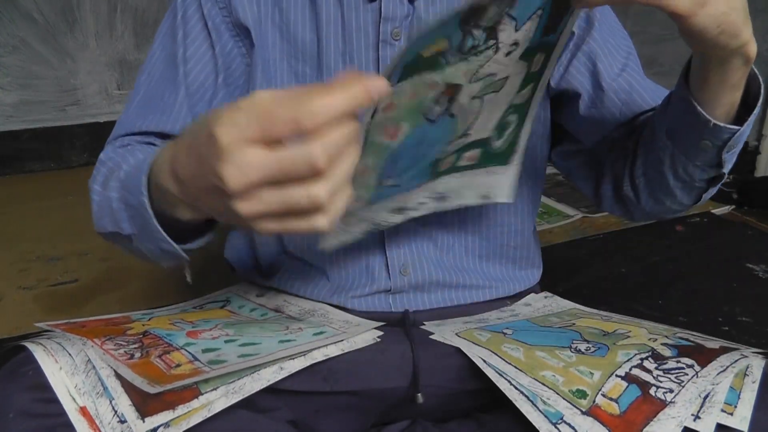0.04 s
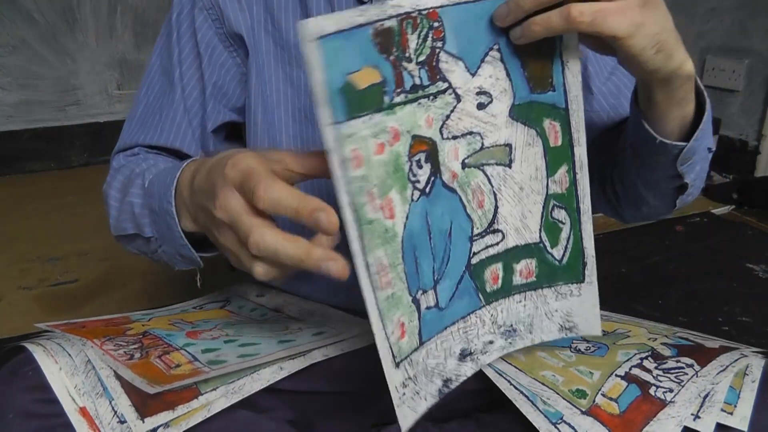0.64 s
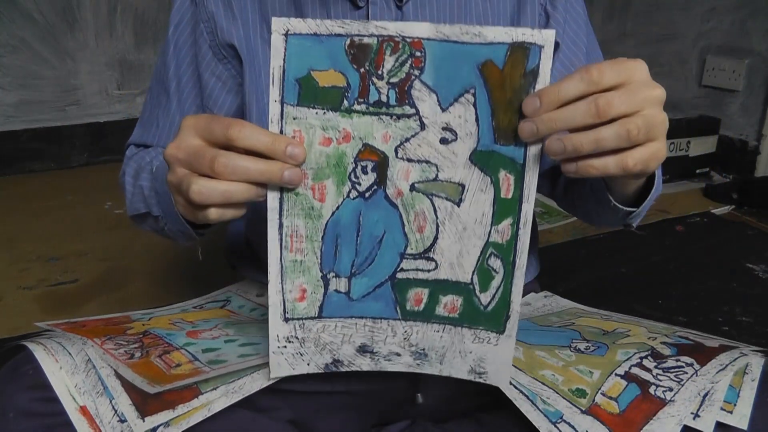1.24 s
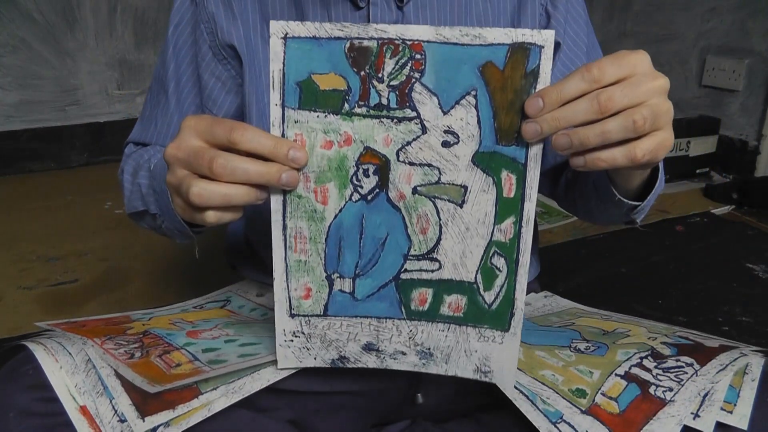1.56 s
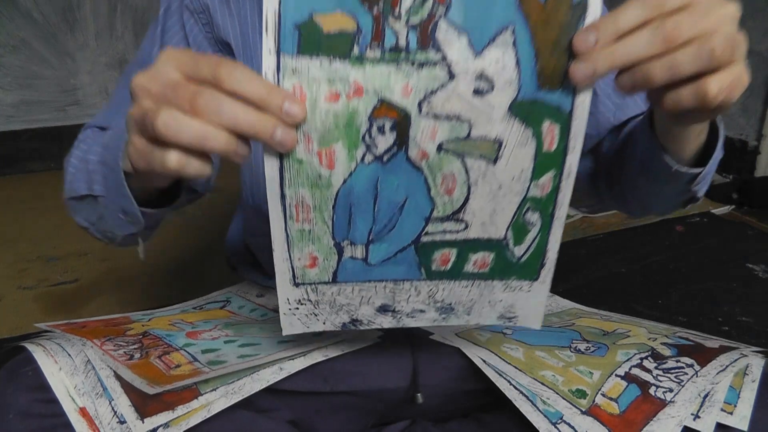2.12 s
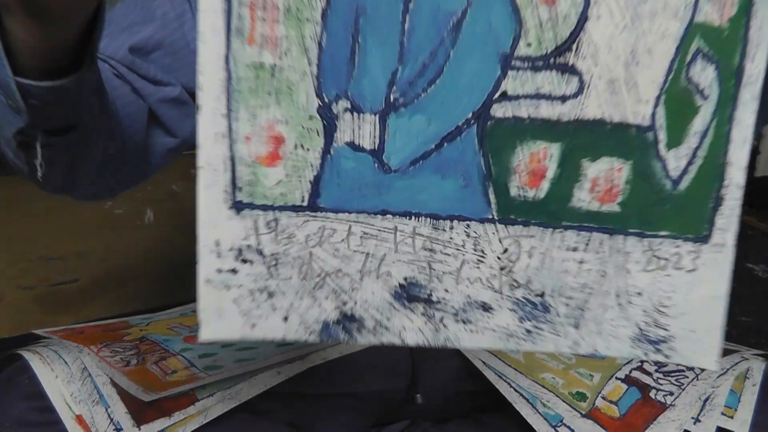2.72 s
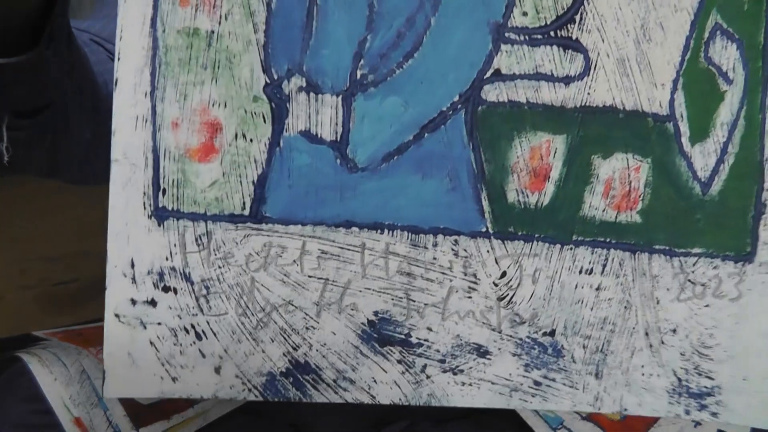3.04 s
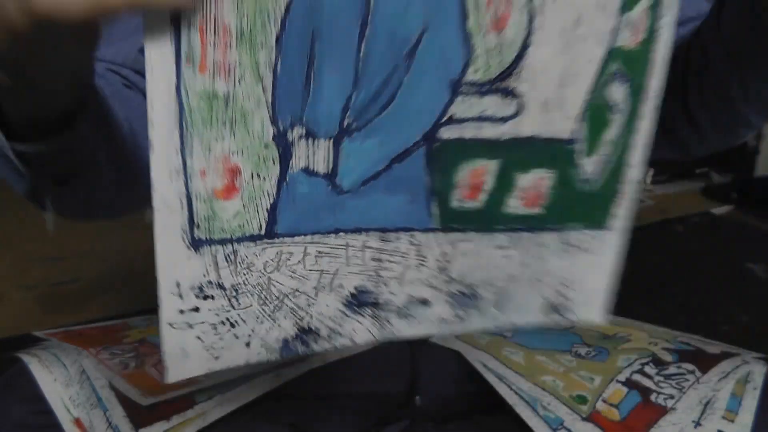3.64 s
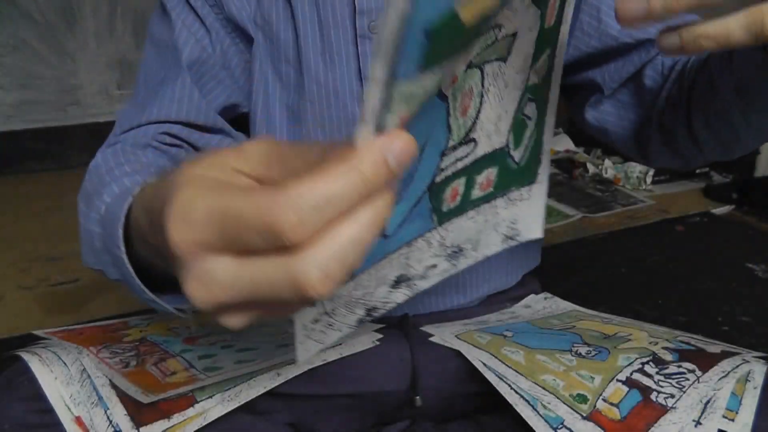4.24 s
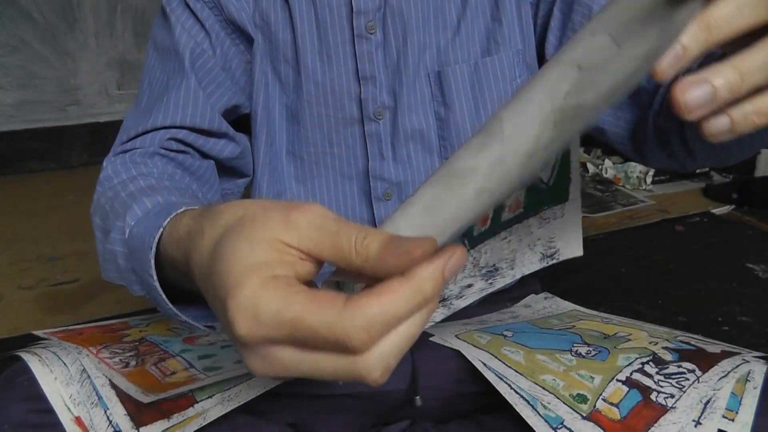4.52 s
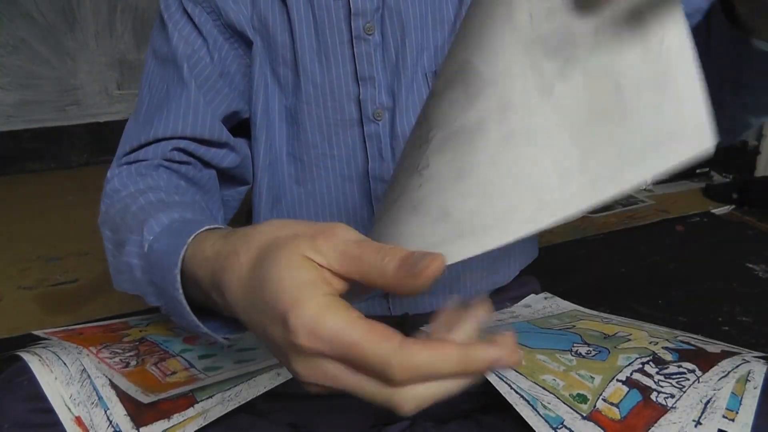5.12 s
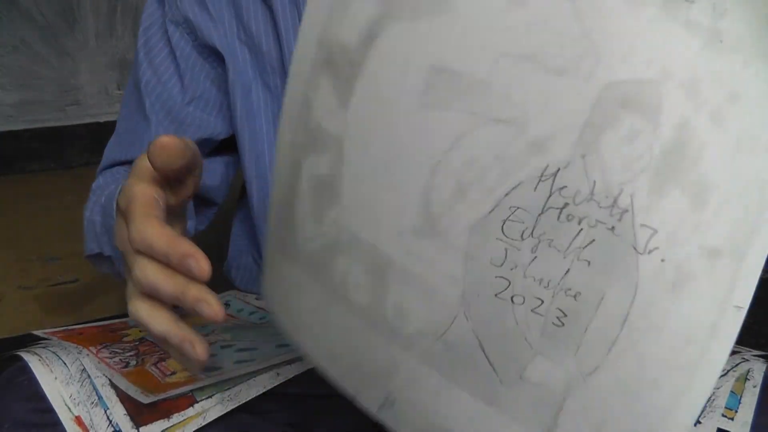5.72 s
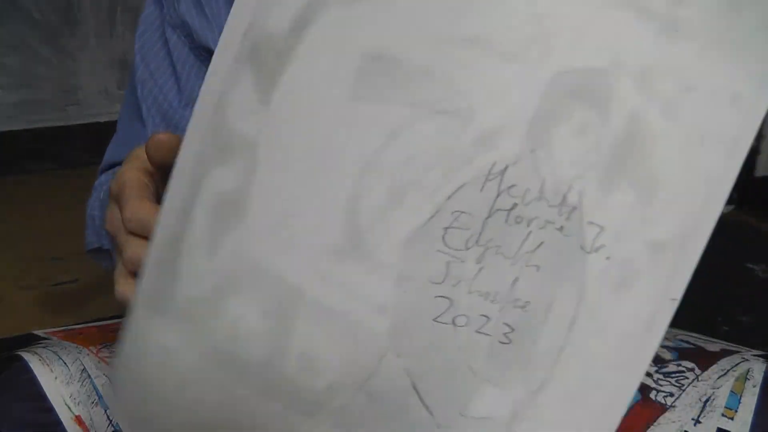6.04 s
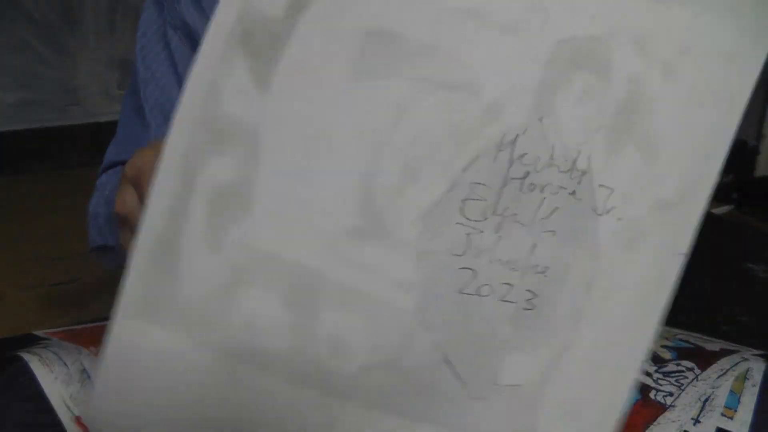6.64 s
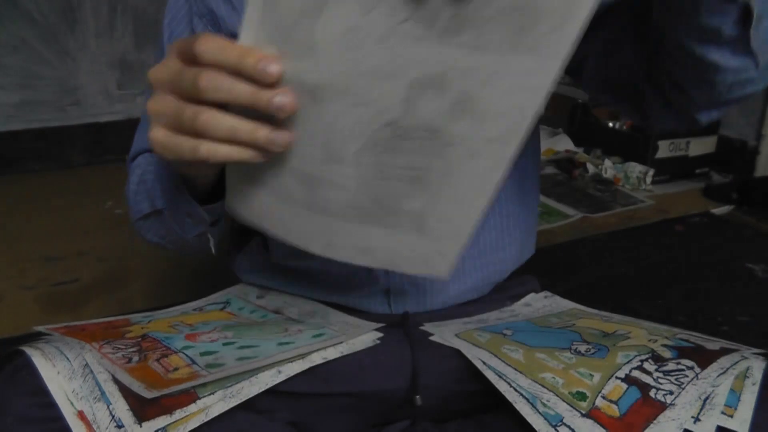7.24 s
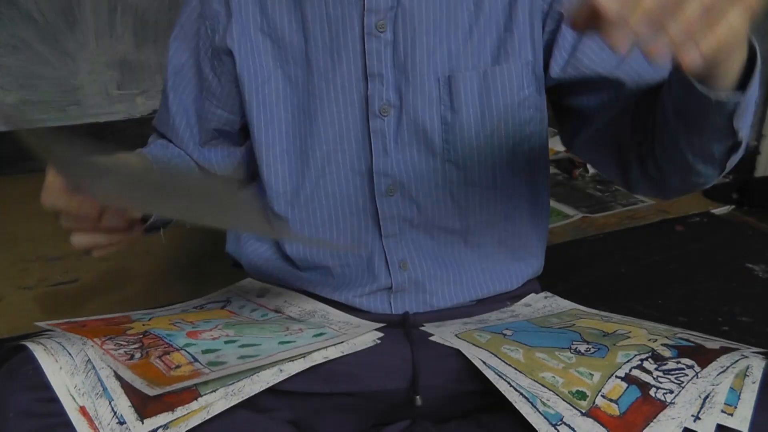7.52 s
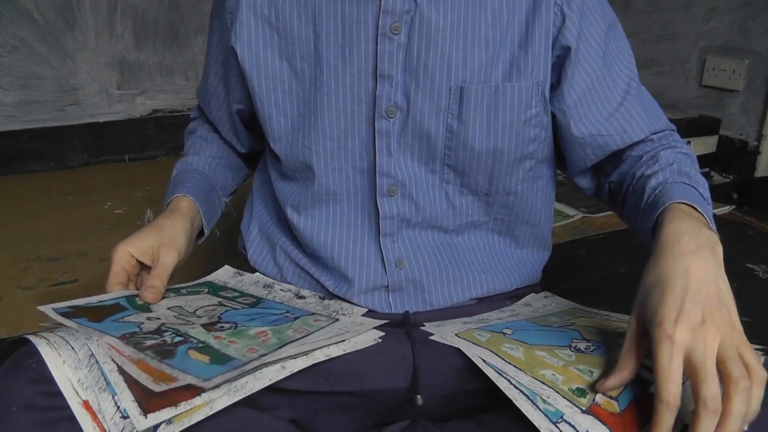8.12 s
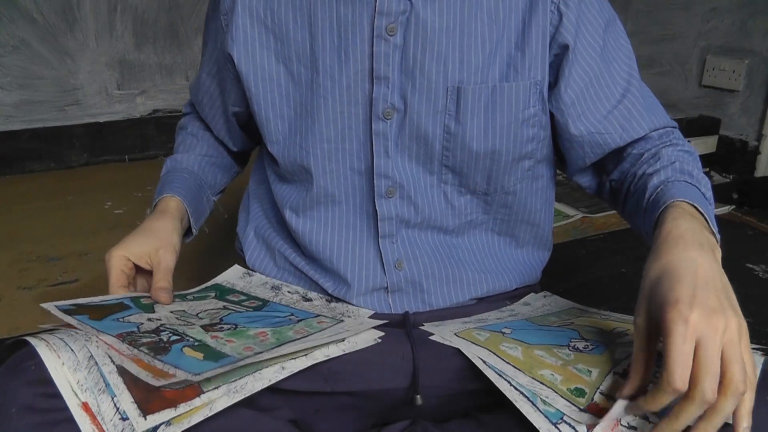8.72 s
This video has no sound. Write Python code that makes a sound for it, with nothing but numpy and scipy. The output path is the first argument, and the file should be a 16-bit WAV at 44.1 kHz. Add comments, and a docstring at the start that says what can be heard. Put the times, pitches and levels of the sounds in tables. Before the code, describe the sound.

Over the faint, steady hum of a small fan, someone handles a stiff paper print, heard close up in stereo in a small, muted room. Dry finger rubs, sharp edge ticks and hollow flexing pops come in two busy spells with a quieter stretch between them. The sheet then flaps, pushing a little air at the microphones, and finally glides paper on paper onto a stack.

```python
"""A small dull room, a stereo pair close to someone on a chair; a small fan hums throughout.
They hold up a stiff paper print: fingers slide over it, its edge snaps free with crisp ticks, and it
buckles with hollow pops and flaps. Softer rubs follow at 2 s, then the handling is busy again from
3.5 to 5.6 s as the sheet is turned about. Near 7.2 s it flaps and wafts air at the microphones;
from 7.8 s it slides onto a pile, paper on paper, smoother and brighter than under the fingers."""
import sys
import numpy as np
from scipy import signal
from scipy.fft import rfft, irfft, next_fast_len
from scipy.io import wavfile

SR = 44100
rng = np.random.default_rng(int(sys.argv[2]) if len(sys.argv) > 2 else 0)


def dump(signal):
    """Clip the signal to [-1, 1] and save it as 16-bit WAV at the path in sys.argv[1]."""
    limited = np.clip(np.atleast_2d(signal).T, -1, 1)
    pcm = np.round(limited * 32767).astype(np.int16)
    wavfile.write(sys.argv[1], SR, pcm)


N = 395577
TIME = np.arange(N) / SR
# a flat spectrum: (frequency [Hz], level [dB])
WHITE = [(100, 0), (10000, 0)]


def from_db(db):
    """Decibels to gain."""
    return 10 ** (np.asarray(db) / 20)


def rms_one(x):
    """Scale to unit power."""
    return x / np.sqrt(np.mean(x ** 2) + 1e-20)


def at_hz(points, hz):
    """Read a spectrum on a log-frequency axis."""
    f, value = np.transpose(points)
    return np.interp(np.log(hz), np.log(f), value)


def colour(x, gain_at):
    """Filter by a gain that is a function of frequency."""
    size = next_fast_len(x.shape[-1] + 2048)
    hz = np.maximum(np.arange(size // 2 + 1) * SR / size, 1)
    return irfft(rfft(x, size) * gain_at(hz), size)[..., :x.shape[-1]]


def butter(x, hz, kind, order):
    """Causal Butterworth filter."""
    return signal.sosfilt(signal.butter(order, np.clip(hz, 10, .45 * SR), kind, fs=SR, output="sos"), x)


def drift(rate_hz, step=40):
    """Slow random wander with a spread of one."""
    pole = np.exp(-2 * np.pi * rate_hz * step / SR)
    noise = rng.standard_normal(N // step + 2002)
    slow = signal.lfilter([1], [1, -2 * pole, pole * pole], noise)[2000:]
    return np.interp(np.arange(N) / step, np.arange(len(slow)), rms_one(slow))


def stereo(pair, spectrum):
    """Two unrelated signals become one coloured sound, partly alike at the two microphones; rms 1."""
    # how alike the two microphones hear: (frequency [Hz], likeness [0-1])
    likeness = [(60, 0.1), (290, 0.35), (640, 0.25), (1400, 0.45), (2300, 0.85), (6000, 0.92), (8500, 0.25),
                (12000, 0.56)]

    def gain(hz, sign):
        return from_db(at_hz(spectrum, hz)) * np.sqrt(1 + sign * at_hz(likeness, hz))
    mid = colour(pair[0], lambda hz: gain(hz, 1))
    side = colour(pair[1], lambda hz: gain(hz, -1))
    return rms_one(np.array([mid + side, mid - side]))


def room_tone(level_db=-56):
    """The still air of the room: a steady, dark noise."""
    # spectrum of the air: (frequency [Hz], relative level [dB])
    air = [(25, -48), (45, -2.5), (70, -10), (110, 3.5), (160, -0.5), (260, 2), (480, -2), (800, -2),
           (1100, -8), (1600, -9), (2200, -12), (3500, -17.5), (5000, -21), (7000, -26), (15000, -24)]
    return from_db(level_db) * stereo(rng.standard_normal((2, N)), air)


def fan(rotor_hz=64.84, waver=0.001277, throb_db=0.78, whine_waver=0.0014):
    """Nine blades sing over weaker rotor orders, and the motor adds a thin whine."""
    # rotor tones: (order [multiple of the turning rate], level [dB])
    orders = [(6, -74.5), (7, -67.5), (9, -55.5), (10, -66.5), (12, -76.5), (14, -72.5)]
    # motor whine: (frequency [Hz], flutter rate [Hz], level [dB])
    whine = [(1342, 51, -71.5), (1369, 27, -69.5), (1378, 54, -74.5), (2040, 15, -79)]
    turn = 2 * np.pi * np.cumsum(rotor_hz * (1 + waver * drift(2.71))) / SR
    out = np.zeros(N)
    for order, db in orders:
        out += from_db(db + throb_db * drift(8.0)) * np.sin(order * turn + rng.uniform(0, 2 * np.pi))
    for hz, flutter_hz, db in whine:
        phase = 2 * np.pi * np.cumsum(hz * (1 + whine_waver * drift(flutter_hz))) / SR
        out += from_db(db + throb_db * drift(flutter_hz)) * np.sin(phase)
    return np.sqrt(2) * out


def room(x, wet_db, wall_hz, bass_db=-2, bass_hz=550, gap_s=0.0099, bass_t60_s=0.29, treble_t60_s=0.11):
    """Dense, dull reflections arrive after a short gap; bass and treble die away at their own rates."""
    t = TIME[:SR // 2]
    echoes = stereo(rng.standard_normal((2, len(t))), WHITE)
    bass = butter(echoes, bass_hz, "low", order=1)
    tail = bass * from_db(bass_db - 60 * t / bass_t60_s)
    tail += (echoes - bass) * from_db(-60 * t / treble_t60_s)
    tail = butter(rms_one(tail * (t > gap_s)) / np.sqrt(len(t)), wall_hz, "low", order=2)
    return x + from_db(wet_db) * signal.fftconvolve(np.atleast_2d(x), tail, axes=1)[:, :N]


def wafts(band_hz=(52, 200)):
    """The swinging sheet wafts air: soft swells of rumble, different at each microphone."""
    # swells of air: (time [s], level [dB], half length [s])
    swells = [(0.686, -54, 0.025), (3.693, -57.5, 0.29), (5.067, -58, 0.11), (5.5, -64, 0.47),
              (7.253, -48.5, 0.045)]
    swell = sum(from_db(db) * np.exp(-((TIME - s) / half) ** 2) for s, db, half in swells)
    return swell * rms_one(butter(rng.standard_normal((2, N)), band_hz, "band", order=4))


def friction(spectrum, per_s, spread_db):
    """Countless fibres catch and let go, each slip with a size of its own."""
    slips = rng.random(N) < per_s / SR
    sizes = from_db(spread_db * np.minimum(rng.exponential(1, N), 4))
    return stereo(slips * sizes * rng.standard_normal((2, N)), spectrum)


def sheet_ring(x, hz, width_hz, block=2048):
    """A resonance whose centre and width move with the grip; it keeps the power of white noise."""
    carrier = np.exp(2j * np.pi * np.cumsum(hz) / SR)
    slow, state = x * carrier.conj(), np.zeros((2, 2), complex)
    for at in range(0, N, block):
        b, a = signal.butter(2, width_hz[at] / 2, fs=SR)
        slow[:, at:at + block], state = signal.lfilter(b, a, slow[:, at:at + block], zi=state)
    return np.real(slow * carrier) * np.sqrt(2 * SR / width_hz)


def finger_rub(partner_wider=1.83):
    """Skin rubs the paper, and the sheet sings in two resonances that shift with the grip."""
    # spectrum of skin on paper: (frequency [Hz], relative level [dB])
    skin = [(150, -8), (450, 1.5), (950, 0), (1500, -0.5), (2200, -3), (2900, -0.5), (3500, -1.5),
            (4400, -5.5), (5100, -5), (7000, -35), (16000, -35)]
    # the resonance and its upper partner, levels against the plain rub:
    # (time [s], centre [Hz], width [Hz], level [dB], partner centre [Hz], partner level [dB])
    grip = [(.3, 3500, 1500, -6, 4960, -11), (.52, 2960, 1400, -14, 4460, -0.5),
            (.6, 2700, 650, 5, 4300, 0), (.66, 3580, 2200, -7, 5400, -17), (.94, 3960, 1100, -2, 4960, -18),
            (2.0, 3800, 500, -1.5, 4900, -12), (2.45, 3500, 1200, -4, 5800, -11),
            (2.66, 3670, 420, -6.5, 6000, -11), (3.5, 3600, 1200, 1, 7700, -6),
            (3.68, 3500, 1300, -4.5, 6900, -5), (3.88, 3400, 1200, -7, 6650, -9),
            (4.02, 3700, 1100, 0, 6800, -6.5), (4.47, 3220, 2000, -6, 5000, -15),
            (4.66, 3930, 1100, -4.5, 5060, -5), (4.94, 3850, 746, 3, 4800, -1.5),
            (5.04, 3950, 1100, -4, 4940, -7.5), (5.4, 3830, 1500, -12.5, 5100, -19),
            (6.96, 3550, 700, -1, 5000, -13), (7.24, 3380, 2000, -5, 5550, -4)]
    times, *columns = np.transpose(grip)
    hz, width_hz, ring_db, partner_hz, partner_db = [np.interp(TIME, times, c) for c in columns]
    ring, partner = from_db(ring_db), from_db(partner_db)
    slips = friction(WHITE, per_s=9000, spread_db=0.5)
    rub = friction(skin, per_s=9000, spread_db=0)
    rub += ring * sheet_ring(slips, hz, width_hz)
    rub += partner * sheet_ring(slips, partner_hz, partner_wider * width_hz)
    return rub / np.sqrt(1 + ring ** 2 + partner ** 2)


def strokes(shape=1.46, hold_rub_db=-96, hold_hiss_db=-77.5):
    """Gains of rub and hiss: both follow each stroke as it gathers speed and slows again."""
    # strokes of skin or paper along the sheet:
    # (fastest moment [s], relative rub level [dB], hiss level [dB], speeding up [s], slowing down [s])
    moves = [(0.04, -69, -65, 0.054, 0.073), (0.18, -56, -70, 0.27, 0.13), (0.32, -59.5, -71, 0.057, 0.06),
             (0.6, -53.5, -57.5, 0.13, 0.11), (0.675, -44, -61, 0.038, 0.026),
             (0.85, -50, -60, 0.032, 0.048), (0.95, -53.5, -62, 0.1, 0.063), (1.23, -60, -63, 0.076, 0.026),
             (1.32, -57.5, -63, 0.057, 0.063), (2.04, -62, -70, 0.16, 0.044), (2.3, -65, -72, 0.05, 0.084),
             (2.5, -61, -67.5, 0.1, 0.11), (2.66, -55.5, -61, 0.049, 0.063), (3.46, -62, -62, 0.032, .035),
             (3.57, -54.5, -63, 0.084, 0.14), (3.68, -54.5, -59, 0.073, 0.041),
             (3.86, -57.5, -66.5, 0.13, 0.091), (4.02, -58.5, -68, 0.076, 0.076),
             (4.48, -54.5, -61.5, 0.078, 0.045), (4.625, -54.5, -60, 0.023, 0.15),
             (4.96, -50.5, -59, 0.064, 0.067), (5.03, -45, -52.5, 0.057, 0.077),
             (5.17, -54.5, -59, 0.04, 0.045), (5.245, -48, -55.5, 0.025, 0.097),
             (5.36, -56.5, -68, 0.035, 0.11), (5.541, -54, -63.5, 0.068, 0.038),
             (6.96, -58.5, -67, 0.047, 0.042), (7.11, -61, -72, 0.048, 0.084),
             (7.235, -51, -55.5, 0.023, 0.041), (7.68, -61, -68, 0.3, 0.12), (7.9, -55.5, -74, 0.02, 0.078),
             (7.98, -58, -56.5, 0.094, 0.1), (8.12, -54.5, -59, 0.22, 0.16), (8.42, -62, -66, 0.032, 0.1),
             (8.58, -56.5, -61.5, 0.053, 0.11), (8.66, -55.5, -56, 0.093, 0.018),
             (8.77, -56, -60.5, 0.11, 0.037), (8.9, -65, -68.5, 0.15, 0.18)]
    t = TIME[::40]
    # fingers that only hold the sheet still creep a little
    rub_power, hiss_power = from_db(hold_rub_db) ** 2, from_db(hold_hiss_db) ** 2
    for s, rub_db, hiss_db, rise, fall in moves:
        # a shape of 2 is a bell; less gives a sharper top and longer skirts
        speed = np.exp(-(np.abs(t - s) / np.where(t < s, rise, fall)) ** shape)
        rub_power += (from_db(rub_db) * speed) ** 2
        hiss_power += (from_db(hiss_db) * speed) ** 2
    return np.interp(TIME, t, np.sqrt(rub_power)), np.interp(TIME, t, np.sqrt(hiss_power))


def slides(rub_gain_db=4.0, judder_db=1.07, pile_from_s=7.8):
    """Sliding contact, first with fingers, then with the pile: a rub and a fine hiss judder together."""
    # spectrum of paper on the pile: (frequency [Hz], relative level [dB])
    pile = [(1500, -7), (2800, -3), (3500, 0), (5150, 1), (5900, -4), (6900, -20), (10000, -20),
            (13500, -10), (16000, -9)]
    # spectrum of the fine friction hiss: (frequency [Hz], relative level [dB])
    fine_hiss = [(3000, -7), (5500, 1.5), (7500, 5.5), (10000, 7), (13000, 3.5), (16000, -27)]
    rub_gain, hiss_gain = strokes()
    grain = np.where(TIME < pile_from_s, finger_rub(), friction(pile, per_s=10000, spread_db=-1.0))
    rub = from_db(rub_gain_db) * rub_gain * grain
    hiss = hiss_gain * friction(fine_hiss, per_s=12000, spread_db=0.5)
    return (rub + hiss) * from_db(judder_db * drift(30))


def flicks(rise_s=0.00089, fall_s=0.004, ring_db=-3, ring_q=6.5):
    """A few milliseconds of violent friction as the edge slips free, ringing at a pitch of its own."""
    # an edge snaps off a finger: (time [s], level [dB], length [s], ring [Hz])
    snaps = [(0.059, -42.5, 0.0032, 3400), (0.11, -46.5, 0.004, 2500), (0.205, -50, 0.003, 2500),
             (0.6703, -33, 0.005, 4000), (0.788, -38.5, 0.0055, 4260), (1.209, -50, 0.0097, 3730),
             (2.198, -56, 0.0067, 1950), (4.477, -49, 0.006, 2900), (4.848, -52.5, 0.008, 3750),
             (4.992, -44, .002, 2800), (5.2225, -37, 0.012, 4000), (5.256, -37, 0.0099, 4300),
             (5.323, -37, 0.005, 4640), (5.329, -33.5, 0.0046, 2150), (6.143, -55, 0.004, 2500),
             (6.773, -55, .003, 3000), (7.2208, -41.5, 0.003, 5400), (8.838, -51, 0.018, 3800)]
    # spectrum of the crisp tick: (frequency [Hz], relative level [dB])
    tick = [(300, -14), (1200, 7), (2500, 2.5), (4100, 1), (5500, -2.5), (7000, -9), (11000, -7),
            (14500, -16), (16000, -20)]
    scrape = friction(tick, per_s=26000, spread_db=1.0)
    out = np.zeros((2, N))
    for s, db, length, hz in snaps:
        near = slice(int(s * SR), int(s * SR) + SR // 20)
        t = TIME[near] - s
        force = from_db(db) * np.clip(t / rise_s, 0, 1) * np.exp(-np.maximum(t - length, 0) / fall_s)
        ring = signal.lfilter(*signal.iirpeak(hz, ring_q, fs=SR), scrape[:, near])
        out[:, near] += force * rms_one(scrape[:, near] + from_db(ring_db) * rms_one(ring))
    return out


def buckle(hz, length, kinks_per_s=2500, kink_size=0.68, puff=0.054, low_hz=170, puff_top_hz=560):
    """The sheet snaps through, then small kinks run across it; each is a damped pulse and a puff of air."""
    t = TIME[:SR // 10]
    kinks = (rng.random(len(t)) < kinks_per_s / SR) * (t < length)
    push = kink_size * rng.choice([-1, 1], len(t)) * kinks
    push[0] = 1
    pop = butter(push, [hz / 2.5, hz * 2.5], "band", order=1)
    pop = butter(pop, hz * 1.55, "low", order=3)
    air = butter(push, puff_top_hz, "low", order=2)
    # a snap quicker than 20 ms moves less air than a slow flap
    pop = butter(pop + puff * min(length / 0.02, 1) * air, low_hz, "high", order=2)
    # bending waves disperse, so each pulse is drawn out over a few cycles
    pop = pop - 2 * signal.lfilter(*signal.iirpeak(hz, Q=2.83, fs=SR), pop)
    return pop / np.sqrt(np.sum(pop ** 2) / (length * SR))


def flexes():
    """The stiff sheet buckles in the hands with hollow pops and flaps."""
    # buckles of the sheet: (time [s], level [dB], pitch [Hz], length [s])
    pops = [(0.057, -42, 670, 0.0037), (0.102, -42.5, 900, 0.014), (0.122, -45, 940, 0.044),
            (0.275, -47, 605, 0.019), (0.532, -40.5, 537, 0.0027), (0.673, -36.5, 587, 0.011),
            (0.679, -34.5, 1100, 0.011), (0.786, -38, 550, 0.0037), (0.808, -45.5, 750, 0.017),
            (0.827, -35.5, 770, 0.021), (0.857, -29, 870, 0.0036), (0.983, -37, 1000, 0.005),
            (1.102, -49, 439, 0.0078), (1.209, -45, 640, 0.026), (1.253, -44, 605, 0.01),
            (1.397, -37.5, 666, 0.0039), (2.203, -57.5, 470, 0.027), (2.862, -49, 520, 0.0064),
            (3.473, -39.5, 565, 0.0042), (3.558, -41.5, 514, 0.025), (3.763, -24.5, 1700, 0.0025),
            (3.766, -35, 547, 0.0045), (3.7686, -22.5, 1000, 0.0017), (4.061, -26.5, 725, 0.0022),
            (5, -35, 1420, 0.0038), (5.077, -42.5, 885, 0.015), (5.1004, -38, 1110, 0.0036),
            (5.125, -45.5, 654, 0.0135), (5.216, -32.5, 980, 0.0018), (5.254, -44.5, 694, 0.0081),
            (5.326, -41.5, 910, 0.0099), (5.332, -42, 1480, 0.0038), (5.375, -47.5, 646, 0.013),
            (5.481, -45, 416, 0.022), (5.653, -55.5, 447, 0.018), (6.145, -44, 424, 0.005),
            (6.182, -38, 360, 0.004), (6.802, -52, 202, 0.018), (7.221, -37, 916, 0.023),
            (7.259, -36, 720, 0.0064), (7.27, -30.5, 950, 0.0011)]
    out = np.zeros(N)
    for s, db, hz, length in pops:
        pop = from_db(db) * buckle(hz, length)
        at = int(s * SR)
        out[at:at + len(pop)] += pop[:N - at]
    return out


def scene():
    """Paper close up, over the fan and the room tone, all a little to the right of the pair."""
    # balance of the microphones: (frequency [Hz], left minus right [dB])
    balance = [(60, -5), (380, -6), (650, -7), (1300, -1.5), (2400, -1.5), (4400, -0.9), (8000, 0),
               (15000, 2)]
    pops = room(flexes(), wet_db=-3.5, wall_hz=1800)
    ticks = room(flicks(), wet_db=-8.0, wall_hz=4500)
    paper = pops + ticks + slides() + wafts()
    background = fan() + room_tone()
    sides = np.array([[.5], [-.5]])
    return colour(paper + background, lambda hz: from_db(at_hz(balance, hz) * sides))


def record(dry, cutoff_hz=15700):
    """The microphone housing cuts three narrow hollows; the top is cut steeply."""
    # hollows in the microphone's response: (frequency [Hz], width [Hz], depth [0-1])
    hollows = [(1775, 133, 0.92), (2392, 114, 1), (3070, 130, 1)]
    for hz, width, depth in hollows:
        dry = dry - depth * signal.lfilter(*signal.iirpeak(hz, hz / width, fs=SR), dry)
    return colour(dry, lambda hz: np.clip((cutoff_hz - hz) / 200 + .5, 0, 1))


dry = scene()
out = record(dry)
dump(out)
```